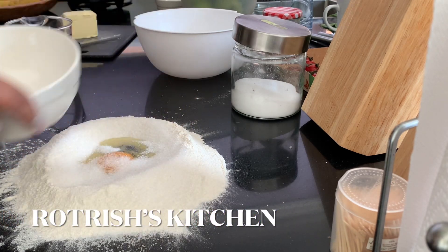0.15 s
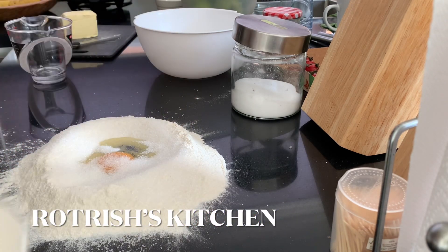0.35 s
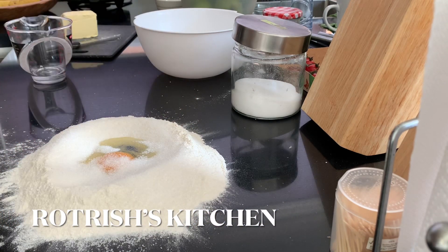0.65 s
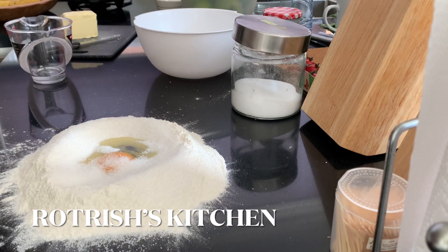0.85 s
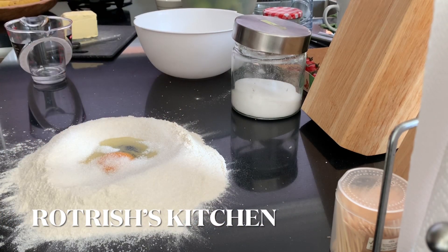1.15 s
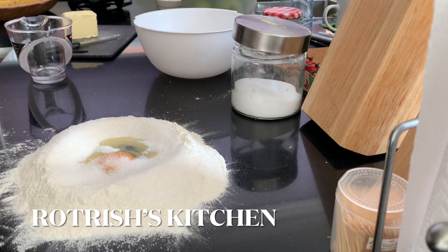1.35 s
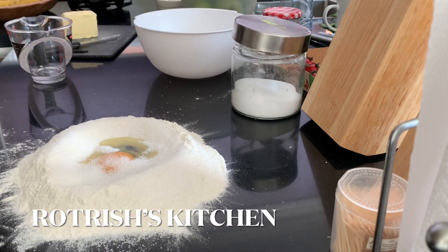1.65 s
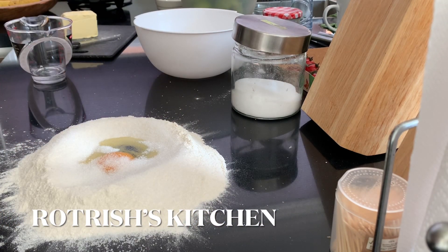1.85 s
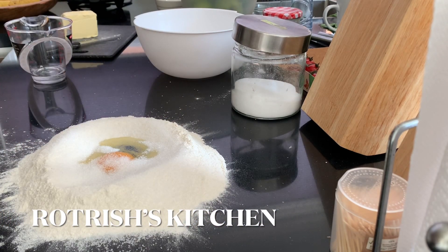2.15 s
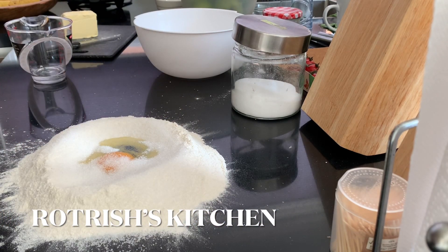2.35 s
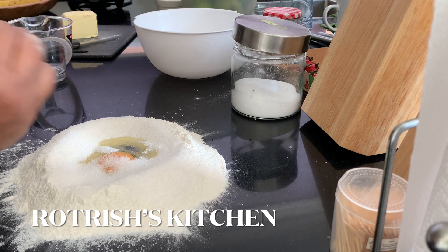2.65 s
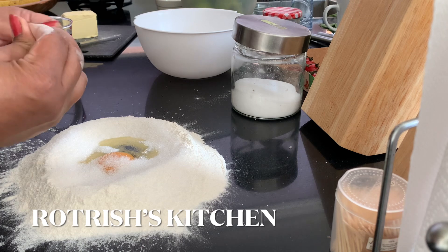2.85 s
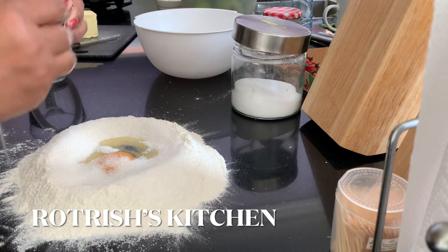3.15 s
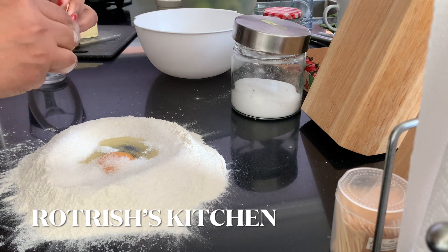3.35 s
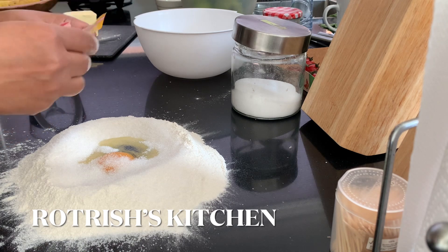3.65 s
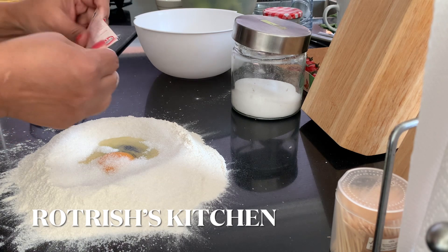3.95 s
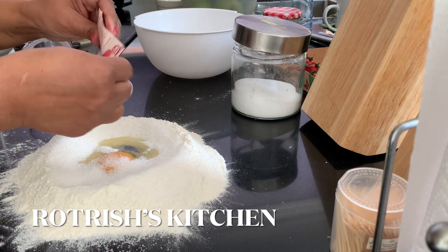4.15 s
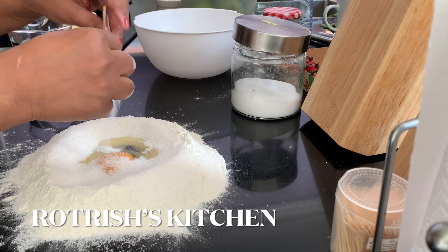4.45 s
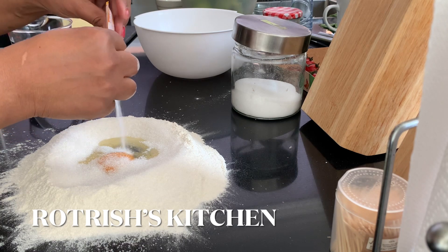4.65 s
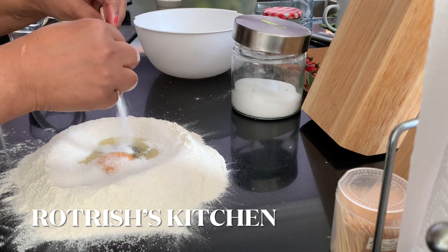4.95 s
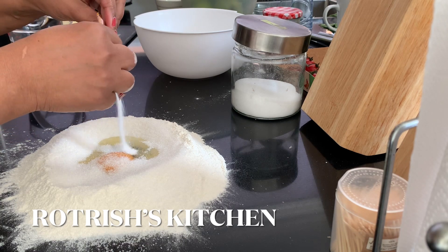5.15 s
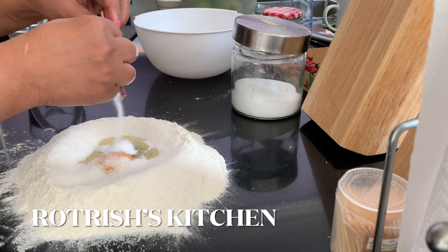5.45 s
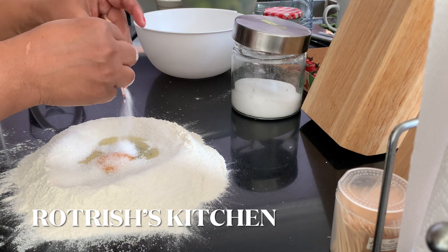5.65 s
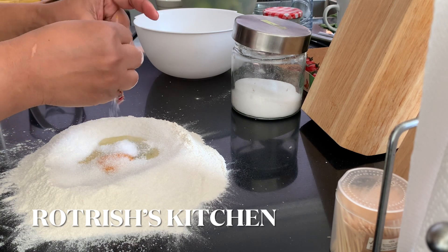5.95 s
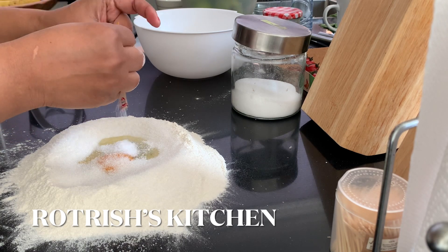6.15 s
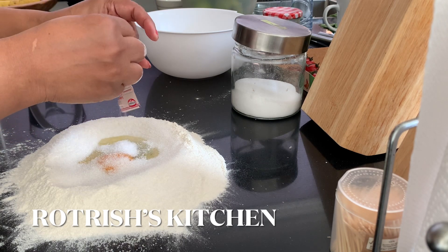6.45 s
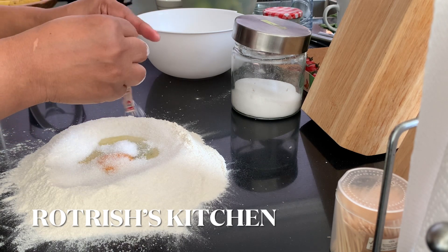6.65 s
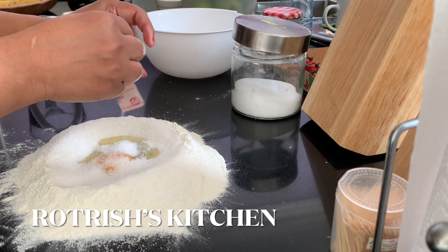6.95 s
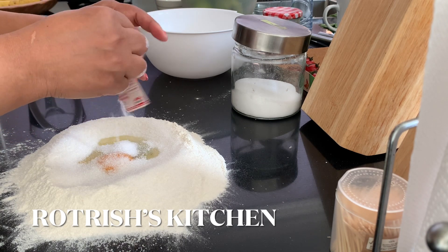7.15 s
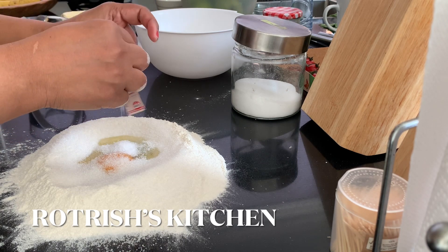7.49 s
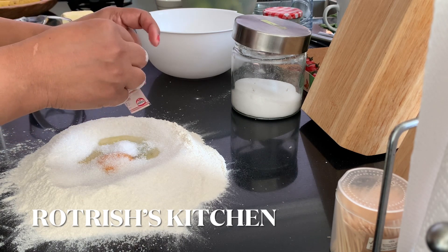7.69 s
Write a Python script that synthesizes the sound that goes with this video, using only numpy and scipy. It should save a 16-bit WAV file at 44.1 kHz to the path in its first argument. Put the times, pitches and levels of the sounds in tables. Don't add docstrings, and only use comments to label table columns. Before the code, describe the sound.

A ceramic bowl clunks and rocks to rest on a hard counter, then a small paper sachet crinkles, tears and is shaken out close by.

```python
import sys
import numpy as np
from scipy import signal
from scipy.fft import rfft, irfft, next_fast_len
from scipy.io import wavfile
from scipy.ndimage import uniform_filter1d

SR = 44100
rng = np.random.default_rng(int(sys.argv[2]) if len(sys.argv) > 2 else 0)


def put_to_file(sound):
    columns = np.atleast_2d(sound).T
    safe = np.clip(columns, -1, 1)
    whole_steps = np.round(safe * 32767)
    wavfile.write(sys.argv[1], SR, whole_steps.astype(np.int16))


def attenuation_scalar(level_db):
    decades = np.asarray(level_db, float) / 20
    return 10 ** decades


N = 344970


def read(points, hz):
    f, value = np.transpose(points)
    return np.interp(np.log(hz + 1), np.log(f + 1), value)


def amp_of(points, hz):
    return attenuation_scalar(read(points, hz))


def evened(x):
    return x / np.sqrt(np.mean(x ** 2) + 1e-20)


def add(mix, s, sound):
    part = mix[..., round(s * SR):][..., :sound.shape[-1]]
    part += sound[..., :part.shape[-1]]


def colour(x, points):
    size = next_fast_len(x.shape[-1])
    gain = amp_of(points, np.fft.rfftfreq(size, 1 / SR))
    return irfft(rfft(x, size) * evened(gain), size)[..., :x.shape[-1]]


# (frequency [Hz], likeness [0-1])
LIKENESS = [(60, .85), (300, 0.01), (1000, 0.7), (2500, 0.49), (5500, 0), (7000, 0.8), (15000, 0.18)]


def paired(z):
    turn_hz = 5500
    size = next_fast_len(z.shape[-1])
    hz = np.fft.rfftfreq(size, 1 / SR)
    same = np.clip(read(LIKENESS, hz), 0, 1)
    a, b = rfft(z, size)
    late = np.exp(-2j * np.pi * np.minimum(hz / turn_hz, 1))
    second = same * a * late + np.sqrt(1 - same ** 2) * b
    return irfft(np.array([a, second]), size)[:, :z.shape[-1]]


# (frequency [Hz], level [dB])
ROOM_TONE = [(30, -16.5), (60, 1), (120, -3), (220, 3), (340, -9), (700, -20), (1100, -18.5), (1700, -22),
             (6000, -26.5), (13000, -24.5), (16000, -33)]


def air():
    slow = uniform_filter1d(uniform_filter1d(rng.standard_normal(N), 3000), 3000)
    hum = evened(colour(paired(rng.standard_normal((2, N))), ROOM_TONE))
    return attenuation_scalar(-73 + 1.3 * evened(slow)) * hum


def ring(modes, span, lead):
    t = np.arange(int(span * SR)) / SR
    hz, db, t60 = np.transpose(modes)[:, :, None]
    phase = 2 * np.pi * hz * t + np.pi * np.round(2 * np.log2(hz / 1100))
    size = attenuation_scalar(db - 60 * t / t60) * (1 - np.exp(-t / 0.00073))
    return np.array([(size * np.sin(phase)).sum(0), (size * np.sin(phase + lead)).sum(0)])


# (time [s], level [dB], glaze ring against the blow [dB])
KNOCKS = [(.7198, -4, -16), (.7365, -18, -38), (.7545, -19, -38), (.761, -8, -15), (.7815, -11.5, -23),
          (.794, -16, -24), (.804, -17, -26), (.814, -19, -32), (.907, -27, -20), (.944, -9, -9),
          (.9502, -10.5, -22), (.9605, -9, -11), (.9697, -9, -13), (.9865, -22, -28), (.998, -25, -27)]
# (frequency [Hz], level [dB], time to die by 60 dB [s])
FOOT_NOTES = [(100.35, -37.5, 0.1), (207.8, -29, 0.067), (264, -19.5, 0.15), (495, -22.5, 0.057),
              (732, -22, 0.062), (830, -10.5, 0.026), (893, -15.5, 0.057), (1111, 0.5, 0.085),
              (1220, -12.5, 0.039), (1600, -14.5, 0.028), (1780, -9, 0.02), (2260, -18, 0.086),
              (2790, -28.5, 0.01), (3380, -36, 0.037)]
# (frequency [Hz], level [dB], time to die by 60 dB [s])
GLAZE_NOTES = [(6690, -4, .05), (6675, -27, .3), (6696, -29, .25), (9945, 0, .05), (9900, -25, .25),
               (12320, -27, .03)]
# (time [s], frequency [Hz], level [dB], time to die by 60 dB [s])
CLINKS = [(0.087, 4750, -72, 0.043), (0.092, 10250, -72, 0.13), (.184, 8400, -66, .006),
          (.184, 4000, -66.5, 0.0066), (.184, 1800, -67.5, .006), (0.184, 2710, -58.5, 0.074),
          (0.186, 7160, -56, 0.014), (0.184, 10200, -61, 0.029), (0.186, 1100, -71, 0.1),
          (0.72, 1050, -36, 0.35), (.793, 7900, -38, 0.011), (.793, 11800, -40, 0.0095),
          (.832, 11900, -47.5, .01), (.946, 1096, -36.5, 1.2), (0.987, 1106, -24.5, 0.12),
          (0.985, 1198, -35.5, .3), (0.96, 45, -50.5, 0.11), (.72, 126, -42, 0.19), (0.719, 388, -36, 0.12),
          (0.829, 253, -40, .12), (.99, 439, -37, 0.15), (1.12, 167, -53, 0.095), (0.76, 70, -41.5, 0.12),
          (.99, 190, -42, 0.22), (1.01, 112, -41, 0.096), (0.943, 3910, -25, .02), (0.949, 3930, -33, .02),
          (0.149, 2660, -79, 0.26), (.19, 4750, -80.5, 0.14), (0.225, 6660, -63.5, 0.061),
          (.657, 3200, -35.5, 0.0076), (.664, 3160, -43, 0.01), (.944, 12700, -29.5, 0.068),
          (.97, 13000, -37.5, 0.069)]
# (frequency [Hz], level [dB])
SCRAPE = [(120, -32.5), (250, -8), (700, 6.5), (1500, 1), (2500, -0.5), (4000, -21.5), (6000, -38),
          (9000, -36.5), (15000, -48)]
# (frequency [Hz], level [dB])
CRISP = [(2200, -43), (4500, -5), (6000, -3), (8000, -5), (9500, 2), (11000, -6.5), (13500, -4.5),
         (15700, -12.5), (16300, -24.5)]


def bowl():
    out = np.zeros((2, N))
    t = np.arange(SR // 4) / SR
    settle = attenuation_scalar(-17 * np.clip((t - .007) / 0.00061, 0, 1))
    u = np.maximum(t[:2048] - .004, 0)
    noise = rng.standard_normal((len(KNOCKS), 2, 2048)) * (u > 0)
    hz, mode_db, t60 = np.transpose(FOOT_NOTES)
    weak = mode_db < -5
    for (s, db, glaze_db), z in zip(KNOCKS, noise):
        shift, tilt = rng.uniform(-1.2, 1, (len(FOOT_NOTES), 2)).T
        foot = np.transpose([hz * (1 + .04 * shift * weak), mode_db + 3 * tilt * weak, t60])
        add(out, s, attenuation_scalar(db - 4) * settle * ring(foot, span=.25, lead=1.1))
        add(out, s, attenuation_scalar(db + glaze_db - 1.5) * ring(GLAZE_NOTES, span=.25, lead=0))
        add(out, s - .004, attenuation_scalar(db - 14.0) * colour(z * np.exp(-u / 0.012), SCRAPE))
        add(out, s - .004, attenuation_scalar(db + glaze_db - 17.5) * colour(z * np.exp(-u / 0.0047), CRISP))
    for s, *mode in CLINKS:
        add(out, s, ring([mode], span=1.0, lead=0.586))
    return out


# (frequency [Hz], time to die by 60 dB [s])
WALLS = [(150, 0.57), (500, 0.72), (1500, 0.73), (4000, 0.7706), (8000, 0.35), (15000, 0.7)]


def kitchen(x, early_db, rise):
    taps = np.zeros((2, SR))
    at = np.arange(150, SR - 20, 20) + rng.integers(0, 20, (2, (SR - 151) // 20))
    np.put_along_axis(taps, at, rng.choice([-1., 1.], at.shape), 1)
    t = np.arange(SR) / SR
    early = 1 + attenuation_scalar(early_db) * np.exp(-t / 0.066)
    taps = paired(taps) * early * (1 - np.exp(-t / rise))
    hz, t, z = signal.stft(taps, SR, nperseg=256)
    dying = attenuation_scalar(-60 * t / read(WALLS, hz)[:, None])
    tail = signal.istft(z * dying, SR, nperseg=256)[1]
    return signal.fftconvolve(x, tail / np.linalg.norm(tail[0]), axes=1)[:, :N]


def grains(spread_db, ms):
    starts = rng.random(N) < 1000 / SR
    size = attenuation_scalar(spread_db * np.minimum(rng.exponential(1, N), 5)) * starts
    shape = signal.lfilter([1], [1, -np.exp(-1000 / (ms * SR))], size ** 2)
    return evened(np.sqrt(shape + 0.57 * shape.mean()) * paired(rng.standard_normal((2, N))))


def patchy(x, patchy_db, drift_db, low_db):
    z = signal.stft(x, nperseg=256)[2]
    chance = rng.standard_normal(z.shape[1:])
    field = uniform_filter1d(uniform_filter1d(chance, size=5, axis=0), size=12, axis=1)
    drift = uniform_filter1d(uniform_filter1d(chance[::-1], size=3, axis=0), size=40, axis=1)
    depth_db = patchy_db + low_db * np.exp(-np.arange(len(chance)) / 2.8)[:, None]
    gain = attenuation_scalar(depth_db * evened(field) + drift_db * evened(drift))
    return evened(signal.istft(z * gain, nperseg=256)[1][:, :N])


def movement(rows, db, swing, linger_db=-15.5):
    span_db, linger_s = 20, 0.416
    s, _, swell, fade = np.transpose(rows)[:4, :, None]
    t = np.arange(0, N + 64, 64) / SR
    under = span_db * np.maximum((s - t) / swell, (t - s) / fade)
    linger = np.where(t > s, span_db * (t - s) / linger_s - linger_db, 200)
    power = (attenuation_scalar(np.reshape(db, (-1, 1)) - swing * np.minimum(under, linger)) ** 2).sum(0)
    return np.interp(np.arange(N) / SR, t, np.sqrt(power))


# (peak time
# [s], level [dB], swell [s], fade [s], slackness [dB])
MOVEMENTS = [(.638, -54.5, 0.016, 0.06, -13), (.716, -67.5, 0.012, 0.027, 28.5),
             (1.32, -81.5, 0.31, 0.13, 30.5), (1.5, -62.5, 0.12, 0.59, -2), (2.24, -50.5, 0.011, 0.056, -13),
             (2.55, -41, 0.029, 0.052, -30), (2.75, -40, 0.082, 0.3, -32), (2.94, -61.5, 0.2, 0.025, 6),
             (3.0, -65.5, 0.032, 0.19, 8), (3.385, -52, 0.056, 0.1, -18), (3.61, -55, 0.011, 0.086, 5.5),
             (4.03, -48.5, 0.27, 0.15, -23.5), (4.18, -51.5, 0.026, 0.48, -22),
             (4.345, -47, 0.043, 0.11, -18), (4.421, -44, 0.16, 0.2, -22), (4.601, -48, 0.086, 0.12, -32),
           (4.831, -51.5, 0.15, 0.97, -17), (5.311, -54.5, 0.25, 0.098, -28),
           (5.662, -49, 0.31, 0.12, -28.5), (5.809, -58, 0.046, 1, -23), (6.081, -57.5, 0.045, 0.44, -18),
           (6.341, -45.5, 0.033, 0.067, -15.5), (6.59, -58.5, 0.079, 0.18, -6),
           (6.871, -55.5, 0.15, 0.042, -10), (6.982, -39, 0.027, 0.045, -14),
           (7.09, -58.5, 0.054, 0.81, -4), (7.31, -59.5, 0.018, 0.085, 0), (7.509, -55, 0.1, 0.21, -1.5),
           (7.81, -56, 0.14, 0.36, -7.5)]
# (frequency [Hz], level [dB])
BODY = [(900, -37), (1500, -2), (2500, 0.5), (4000, -1.5), (5500, -25.5)]
# (frequency [Hz], level [dB])
FLAP = [(200, -40), (500, -6), (900, 6), (1300, 3), (2000, -20)]


def rustle():
    drive = patchy(grains(spread_db=2.0, ms=0.77), patchy_db=3.0, drift_db=2.0, low_db=3.5)
    rows = MOVEMENTS
    db, slack_db = np.transpose(rows)[[1, 4]]
    crisp = movement(rows, db, swing=0.89) * colour(drive, CRISP)
    body = movement(rows, db - 1.5 + 0.4 * slack_db, swing=0.69) * colour(drive, BODY)
    flap = movement(rows, db + slack_db - 1.0, swing=0.97, linger_db=-23.5) * colour(drive, FLAP)
    return attenuation_scalar(-3.0) * (crisp + body + flap)


def level(rows, col=1):
    rows = np.asarray(rows)
    return np.interp(np.arange(N) / SR, rows[:, 0], rows[:, col], left=-120, right=-120)


# (peak time [s], level [dB], swell [s], fade [s])
BUMPS = [(.77, -48, .012, 0.15), (1.001, -41, 0.013, 0.079), (5.2, -67.5, 0.14, 0.43),
         (1.4, -80.5, 0.17, 1.4), (2.719, -59.5, 0.011, 0.082), (2.95, -56, 0.02, 0.12),
         (3.798, -64, 0.21, 0.6), (4.19, -59.5, 0.038, 0.057), (4.419, -59.5, 0.093, 0.081),
         (4.74, -62, 0.018, 0.095), (5.7, -61.5, 0.072, 0.045), (6.96, -60, 0.022, 0.45)]
# (frequency [Hz], level [dB])
BUMP_COLOUR = [(120, -18), (200, 3), (350, 1.5), (550, -1.5), (800, -36.5)]
# (time [s], level [dB], pitch of the hollow under it [Hz])
DRAG = [
    (2.16, -74.5, 2450),
    (2.228, -59, 2310),
    (2.574, -64, 2650),
    (2.68, -86, 2790),
]


def hands():
    noise = grains(spread_db=4.5, ms=5)
    turn = np.exp(2j * np.pi * np.cumsum(np.maximum(level(DRAG, col=2), 2000)) / SR)
    r = np.exp(-np.pi * 750 / SR)
    drag = evened((turn * signal.lfilter([1], [1, -2 * r, r * r], noise / turn)).real)
    bumps = movement(BUMPS, np.transpose(BUMPS)[1], swing=0.91, linger_db=-47) * colour(noise, BUMP_COLOUR)
    return attenuation_scalar(level(DRAG) - 5.0) * drag + attenuation_scalar(-4.5) * bumps


# (time [s], level
# [dB], slackness [dB], ringing patch [Hz])
SNAPS = [(1.151, -47, 14.5, 1450), (1.312, -32.5, -18, 2940), (1.4181, -47.5, 8, 2670),
         (1.487, -36.5, 0.5, 3160), (1.585, -42.5, 0, 2730), (1.67, -45, -1.5, 3070),
         (1.735, -52.5, 13.5, 2100), (1.894, -46, 1, 3680), (2.0287, -48.5, -16.5, 3750),
         (2.234, -31, -37, 2490), (2.4326, -45.5, -7, 2400), (2.4983, -48, -7, 2770),
         (2.525, -42, -43, 6770), (2.538, -36, -46, 11700), (2.553, -36.5, -10.5, 2880),
         (2.6628, -34.5, -52, 6470), (2.693, -29.5, -65, 11220), (2.72, -30.5, -8, 4620),
         (2.7473, -32, -13, 11900), (2.865, -37, -13, 7440), (2.9429, -26, 2.5, 11300),
         (3.0279, -36, -13, 11350), (3.1253, -48.5, -9, 10450), (3.1678, -43, -46, 4980),
           (3.375, -35, -10, 5500), (3.3892, -37, -8, 6000), (3.44, -33.5, -27, 11300),
           (3.593, -41, -39.5, 5950), (3.613, -32.5, -44, 4500), (3.42, -38, -21, 1600),
           (3.73, -61, 17, 1490), (3.789, -73.5, 28, 684), (3.856, -43, -30, 6380),
           (3.858, -60.5, 13, 1495), (3.892, -33.5, -38, 10900), (3.929, -62.5, 21.5, 1370),
           (4.1782, -31.5, -5, 10260), (4.341, -34, -10, 3960), (4.715, -39, -43, 6500),
           (4.7312, -34, -7, 4200), (4.8007, -40, -15, 4920), (4.833, -26, -21.5, 12500),
           (4.9052, -35.5, -11.5, 9410), (4.968, -35, -21, 6740), (5.174, -55.5, 8.5, 4070),
           (5.222, -41.5, -28, 3750), (5.2956, -33.5, -48, 6720), (5.341, -39.5, -10.5, 4300),
           (5.4467, -44, -7.5, 10400), (5.678, -33.5, -7.5, 11400), (5.8836, -36, -30, 4260),
         (6.063, -35, -11, 6740), (6.082, -39, -15, 6600), (6.13, -35.5, -25, 6620),
          (6.2252, -44.5, -3.5, 4550), (6.3196, -39, -3, 11430), (6.359, -32.5, -40, 4580),
          (6.472, -37.5, -8.5, 11300), (6.5935, -34, -9.5, 7300), (6.731, -44, -4.5, 10270),
          (6.805, -31, -49, 4680), (6.866, -30, -18, 7320), (6.88, -39.5, -6, 6900),
          (6.951, -31, -3.5, 6700), (6.968, -25.5, -40, 6800), (6.986, -22.5, -50, 4330),
          (7.07, -36, -40, 6700), (7.0902, -20, -29, 10800), (7.174, -32.5, -16, 4600),
          (7.2166, -36.5, 0.5, 8000), (7.3014, -36.5, -4.5, 6700), (7.324, -33.5, -44.5, 7100),
          (7.423, -57, -11, 1780), (7.4437, -37.5, -12, 5400), (7.4929, -30, -18, 5100),
          (7.5691, -34, -9, 5100), (7.639, -41.5, -4, 6750), (7.7007, -36.5, -1, 6260),
         (1.492, -44, -14, 3060), (1.566, -45, -8, 3650), (1.6412, -49.5, -4.5, 2370),
         (1.708, -64, -5, 2070), (1.7453, -46.5, 6.5, 2040), (1.869, -63.5, 13.5, 2470),
         (2.175, -66, -19, 2260), (2.1933, -70, -12, 2180), (2.207, -65, -13, 2170),
         (2.2379, -36, -28, 5120), (2.244, -31, -37, 2610), (2.383, -57, -4, 2640),
         (2.5196, -42.5, -24, 2600), (2.6393, -44, -43, 7100), (2.769, -54, -27, 6000),
         (4.187, -37.5, -13, 5020), (4.354, -35, -30, 4520), (5.01, -46, -9, 6000), (5.349, -46, -6, 4270),
         (5.609, -50.5, -33, 11310), (5.687, -40, -13.5, 8970), (6.2088, -46, -25, 6890),
         (6.566, -52, -11, 6660), (6.7928, -44, -9, 4420), (6.8357, -40, -17.5, 10400),
         (6.979, -25.5, -35, 4000), (6.991, -34, -28, 5000), (7.311, -34, -12.5, 9500),
         (7.506, -40, -19.5, 4950), (7.7573, -55.5, -20, 6700), (3.625, -38.5, -23, 6100),
         (3.404, -56, -40, 9970), (4.036, -35, -42, 11100), (6.345, -41.5, -13, 4470),
         (6.616, -42.5, -28, 6000), (3.3, -59.5, -4, 2000)]


def snaps():
    out = np.zeros((2, N))
    t = np.arange(2048) / SR - .004
    rows = SNAPS
    noise = rng.standard_normal((len(rows), 2, len(t)))
    shake = (t > 0) * attenuation_scalar(-21) * np.exp(-t / 0.024)
    for (s, db, slack_db, hz), z in zip(rows, noise):
        u = np.maximum(t, 0) / (0.001 * attenuation_scalar(-0.28 * (db + 23.5)))
        patch = [(hz * 0.8, -6), (hz, 3), (hz * 1.29, -6)]
        crack = colour(z * np.minimum(u * 1.3, 1) * np.exp(-u), patch)
        burst = paired(attenuation_scalar(-23.5) * evened(crack) + z * shake)
        body_db = 1.5 + 0.28 * slack_db - 5.5 * np.log2(hz / 4500)
        body = attenuation_scalar(body_db) * colour(burst, BODY)
        flap = attenuation_scalar(slack_db - 3.5) * colour(burst, FLAP)
        add(out, s - .004, attenuation_scalar(db - 0.54) * (colour(burst, CRISP) + body + flap))
    return out


# (time [s], frequency [Hz], level [dB], time to die by 60 dB [s])
POPS = [(2.24, 70, -61, .12), (1.415, 710, -68, .04), (5.9, 1500, -66.5, 0.031), (1.312, 2930, -43, 0.028),
        (1.667, 700, -52.5, 0.046), (1.745, 620, -53, 0.042), (2.236, 660, -53.5, 0.046),
        (2.275, 800, -61.5, .08), (2.553, 608, -59.5, 0.049), (2.774, 231, -56, 0.047),
        (2.866, 845, -53, .11), (3.72, 1428, -52, 0.044), (3.787, 450, -58.5, .05),
        (3.857, 1515, -57, 0.063), (3.923, 1414, -60.5, 0.039), (3.982, 1440, -55, 0.036),
        (4.342, 3980, -44, 0.069), (4.391, 3950, -53.5, .15), (1.487, 3100, -42, 0.024),
        (1.736, 2195, -54, 0.018), (4.415, 502, -60, 0.049), (4.482, 1304, -56, 0.033),
        (5.175, 453, -62, 0.034), (5.635, 1200, -59, 0.045), (5.652, 893, -61, 0.048),
        (5.708, 600, -67, 0.045), (6.343, 1154, -46, .03), (6.357, 4454, -35, .02),
        (6.373, 1560, -56, 0.033), (6.529, 910, -61.5, .02), (6.828, 1110, -49, 0.031),
        (7.147, 4330, -49, .02), (7.158, 1004, -54.5, .03), (7.303, 880, -56, .04),
        (7.363, 894, -55.5, .03), (7.517, 2190, -54, .02), (7.693, 1240, -55, 0.024)]


def pops():
    out = np.zeros((2, N))
    for s, *mode in POPS:
        add(out, s, ring([mode], span=0.23, lead=1.0))
    return out


# (frequency [Hz], level [dB])
ROUND_CORNER = [(60, -8), (150, 1), (700, -1.5), (1100, -13.5), (1500, -2), (2800, -4), (5000, 2),
                (7000, -12.5), (12000, -24)]


def scene():
    far = bowl() * attenuation_scalar([[.8], [-.8]])
    near = rustle() + hands() + snaps() + pops()
    far_echo = attenuation_scalar(-7.0) * kitchen(colour(far, ROUND_CORNER), early_db=-3.0, rise=0.013)
    near_echo = attenuation_scalar(-5.5) * kitchen(near, early_db=2.8, rise=0.00067)
    return air() + far + far_echo + near + near_echo


def thinned(x, below_db, floor_db, fickle_db, thrift_db):
    window = np.sin(np.pi * (np.arange(2048) + .5) / 2048)
    both = np.array([x[0] + x[1], x[0] - x[1]]) / 2
    z = signal.stft(both, window=window, nperseg=2048)[2][:, :1024]
    db = 10 * np.log10((abs(z) ** 2).reshape(2, 64, 16, -1).mean(2) + 1e-20)
    height = np.linspace(0, 1, 64)[:, None]
    chance = evened(uniform_filter1d(rng.standard_normal(db.shape), size=3, axis=2))
    margin = fickle_db * chance - thrift_db * height
    attack = np.diff(db[:, 12:44].max((0, 1)), prepend=0) > 9
    margin -= 20 * height ** 2 * (np.roll(attack, 2) | np.roll(attack, -1))
    keep = (db + margin > db[::-1] - below_db) & (db + margin / 2 > db.max((0, 1)) - floor_db)
    keep[:, :5] = True
    keep |= attack
    z = np.pad(z * np.repeat(keep, 16, axis=1), ((0, 0), (0, 1), (0, 0)))
    mid, side = signal.istft(z, window=window, nperseg=2048)[1][:, :N]
    return np.array([mid + side, mid - side])


def top_cut(x):
    return signal.sosfilt(signal.butter(12, 17000, fs=SR, output="sos"), x)


# (frequency [Hz], lead [radians])
LEAD = [(0, -6.28), (6350, -6.28), (15750, 6.28), (22050, 14.7)]
# (frequency [Hz], left minus right [dB])
TILT = [(60, 0), (110, -3), (200, -2.5), (380, -1), (700, 0.5), (1290, 1), (2380, 0.5), (4400, -2),
        (8120, -1.5), (15000, 2)]


def record(dry):
    size = next_fast_len(N)
    hz = np.fft.rfftfreq(size, 1 / SR)
    half = np.interp(hz, *np.transpose(LEAD)) / 2
    a, b = rfft(dry, size)
    treble = np.clip((hz - 6200) / 1400, 0, 1)
    mid, side = -a * np.cos(half), 1j * b * np.sin(half)
    left = treble * (mid + side) + (1 - treble) * a
    right = treble * (mid - side) + (1 - treble) * b
    tilt = np.sqrt(amp_of(TILT, hz))
    edge = attenuation_scalar(-40 * np.clip((hz - 15800) / 500, 0, 2))
    pair = irfft(np.array([left * tilt, right / tilt]) * edge, size)[:, :N]
    plain = irfft(np.array([a * tilt, b / tilt]) * edge, size)[:, :N]
    power = signal.lfilter([1, -1], [1], dry[0]) ** 2
    sharp = uniform_filter1d(power, size=90) > 9 * uniform_filter1d(power, size=1800)
    sharp = np.clip(2 * uniform_filter1d(1. * sharp, size=130), 0, 1)
    pair = pair + sharp * (plain - pair)
    mix = thinned(pair, below_db=18, floor_db=53, fickle_db=6.5, thrift_db=23.5)
    return top_cut(mix)


dry = scene()
out = record(dry)
put_to_file(out)
```